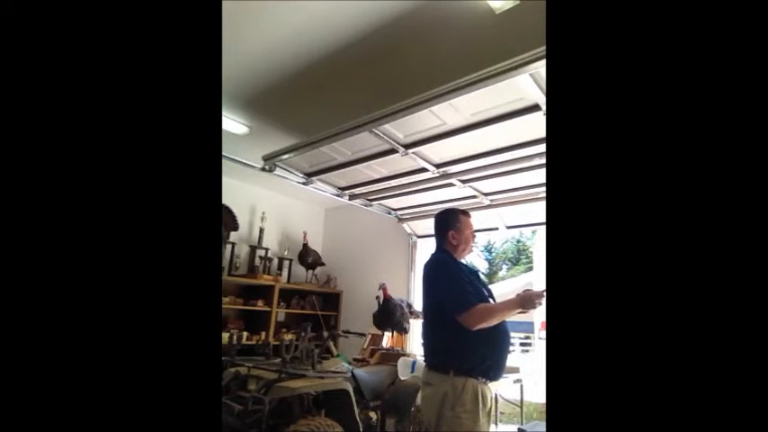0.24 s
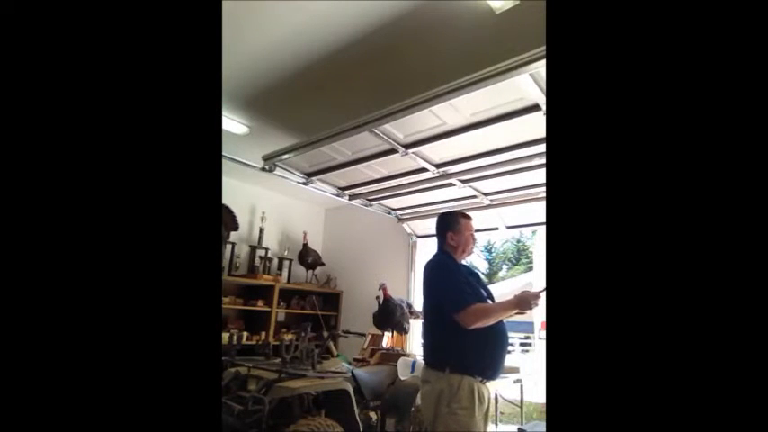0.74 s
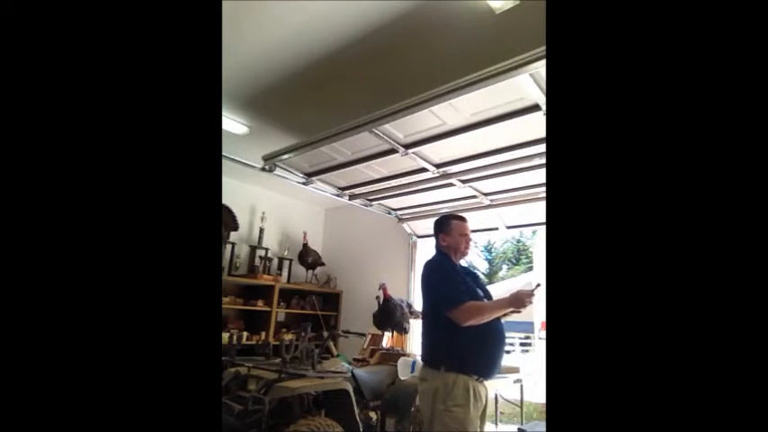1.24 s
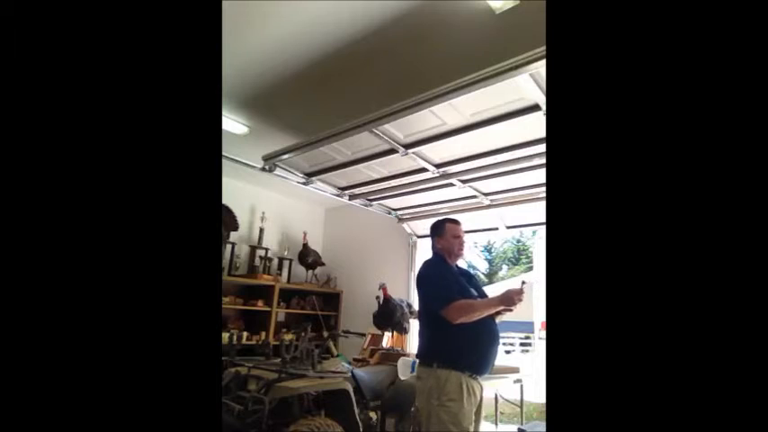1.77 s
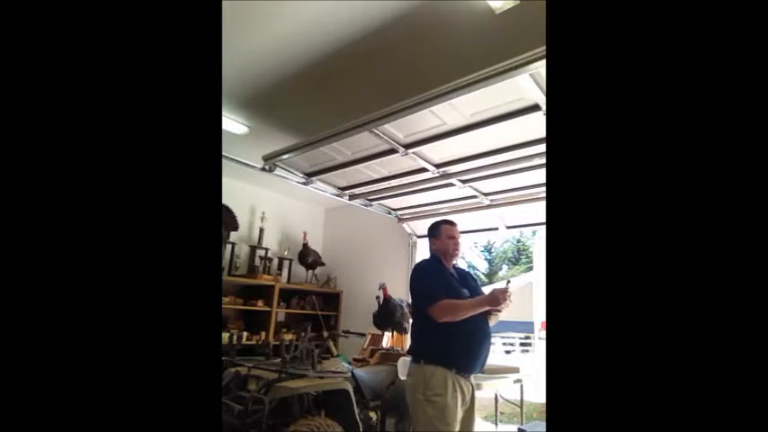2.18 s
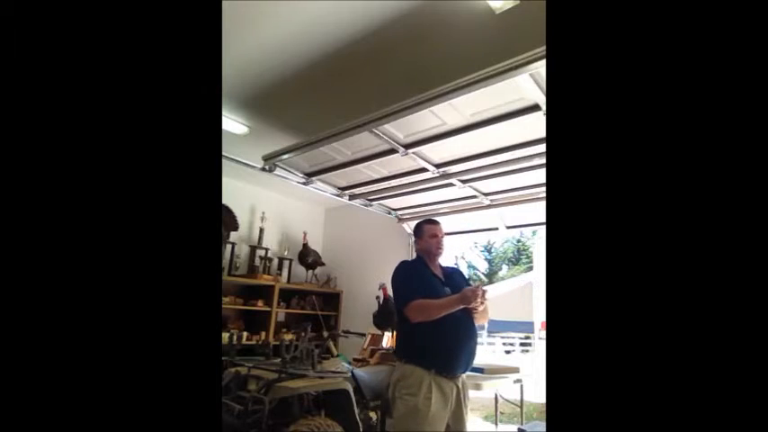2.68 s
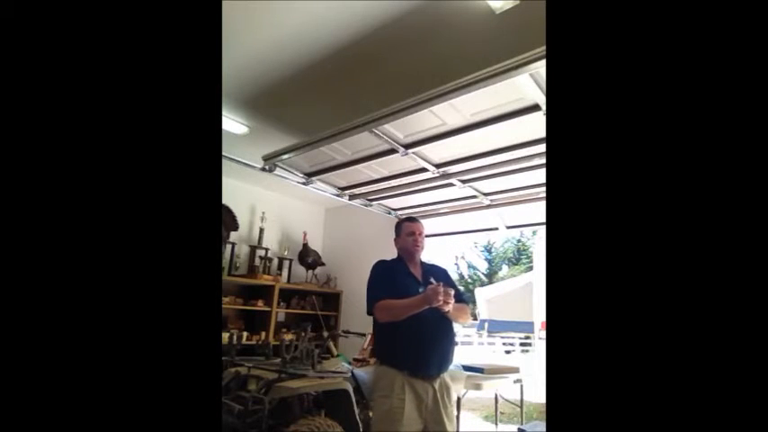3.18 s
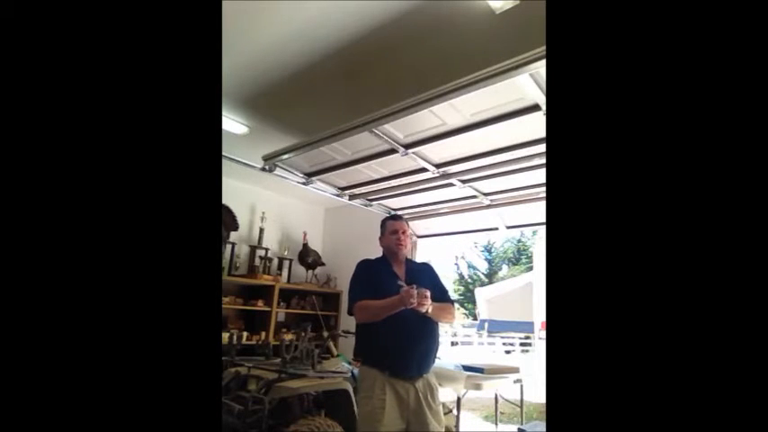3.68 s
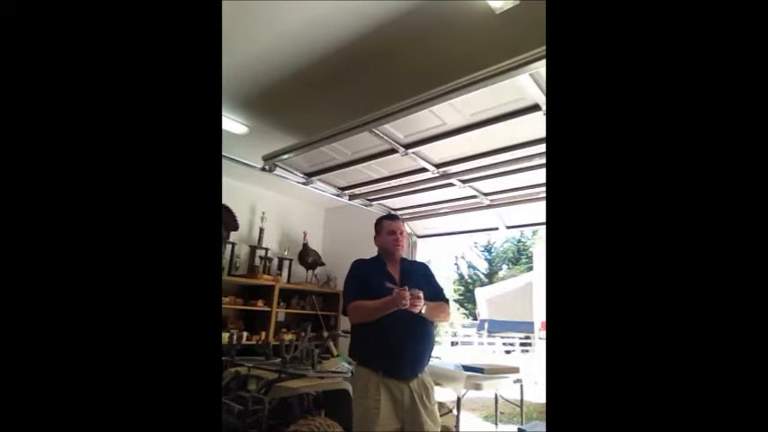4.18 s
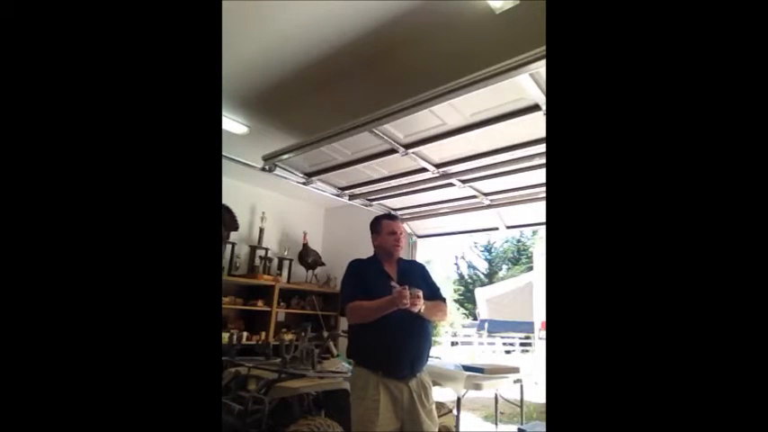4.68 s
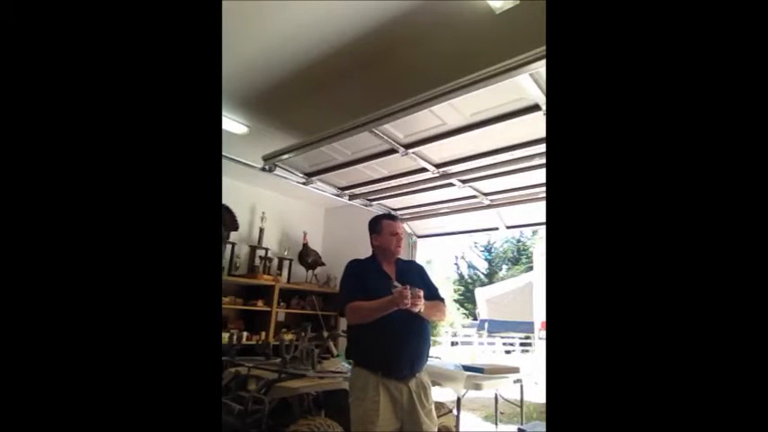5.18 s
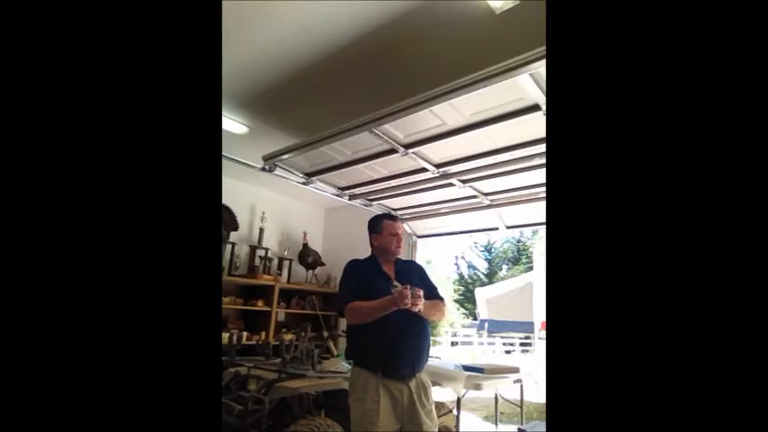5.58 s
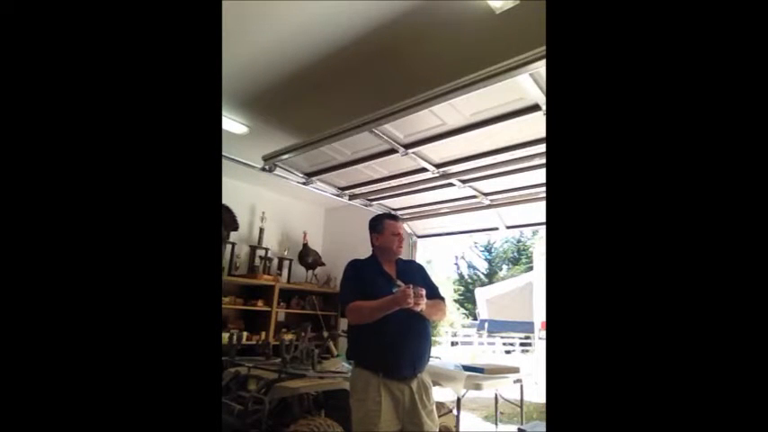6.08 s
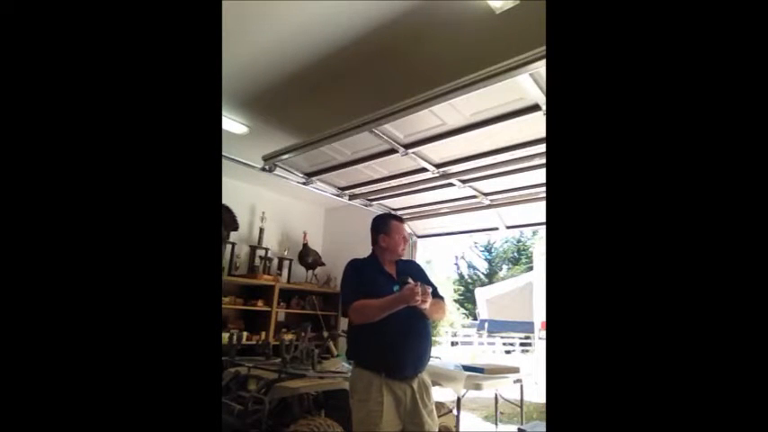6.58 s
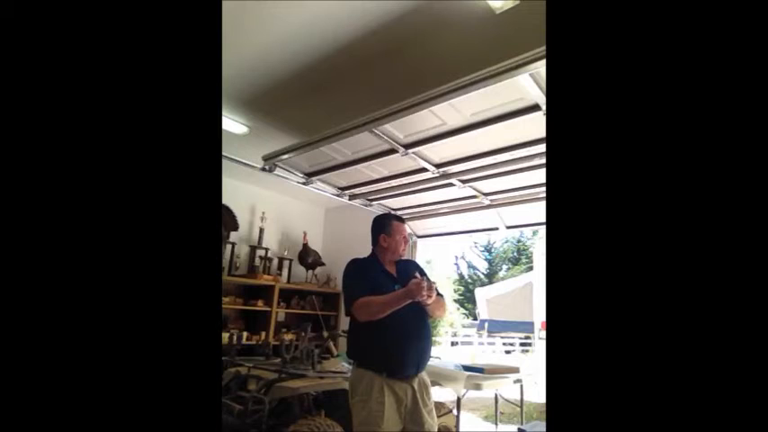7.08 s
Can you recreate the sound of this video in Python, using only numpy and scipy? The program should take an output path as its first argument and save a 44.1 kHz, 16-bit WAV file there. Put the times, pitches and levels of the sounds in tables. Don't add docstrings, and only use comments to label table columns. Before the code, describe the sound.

Several metres from a phone microphone in a concrete garage, a hand-stroked wooden turkey call gives a faint rub and soft try, then ten loud yelps, about three a second. Each is a brief high squeak breaking into a lower, woody rasp. After a gap come a faint lid touch and two dry, separate clucks, with bright echoes over distant outdoor hum.

```python
import sys
import numpy as np
from scipy import signal
from scipy.fft import rfft, irfft
from scipy.io import wavfile
from scipy.ndimage import uniform_filter1d, minimum_filter1d

SR = 44100
rng = np.random.default_rng(int(sys.argv[2]) if len(sys.argv) > 2 else 0)


def gain_from_db(level_db):
    decades = np.asarray(level_db, float) / 20
    return 10 ** decades


def generate_wav(sig):
    pcm = np.round(np.clip(np.atleast_2d(sig).T, -1, 1) * 32767).astype(np.int16)
    wavfile.write(sys.argv[1], SR, pcm)


N = 323694


def curve(table, x):
    return np.interp(x, *np.transpose(table))


def colour_db(table, hz):
    f, db = np.transpose(table)
    return np.interp(np.log(np.maximum(hz, 1)), np.log(f), db)


def noise(table, db):
    spectrum = rfft(rng.standard_normal(N))
    x = irfft(spectrum * gain_from_db(colour_db(table, np.fft.rfftfreq(N, 1 / SR))), N)
    return x / x.std() * gain_from_db(db)


def add_clicks(track, at, size):
    taps = np.floor(at)[:, None] + np.arange(-7, 9)
    gap = taps - at[:, None]
    window = np.cos(np.pi * gap / 16) ** 2
    np.add.at(track, taps.astype(int), size[:, None] * np.sinc(gap) * window)


def split_filter(x, order, hz, kind="low"):
    return signal.sosfilt(signal.butter(order, hz, kind, fs=SR, output="sos"), x)


# (frequency [Hz], density [dB per Hz])
HUM = [(18, -59.5), (30, -37), (53, -40.5), (114, -7.5), (230, -10), (808, -7.5), (1910, -15), (3400, -18),
       (10500, -28), (13000, -26.5), (15500, -26.5)]


def outdoor_hum():
    return noise(HUM, -66)


# (frequency [Hz], rms level [dB])
MAINS = [(166.9, -86.5), (242.2, -82.5)]


def mains_whine(t):
    return sum(gain_from_db(db) * np.sqrt(2) * np.sin(2 * np.pi * hz * t) for hz, db in MAINS)


# (time [s], level [dB])
TAIL_LEVEL = [
    (0, -61),
    (.1, -62.5),
    (.25, -84),
    (.4, -95),
]
# (frequency [Hz], density [dB per Hz])
TAIL_COLOUR = [(88, -38.5), (150, 1.5), (228, -33), (296, -1.5), (415, -11.5), (1210, -11), (1750, -10.5),
               (6000, -21), (7800, -52), (13200, -120)]


def opening_tail(t):
    return noise(TAIL_COLOUR, curve(TAIL_LEVEL, t))


# (frequency [Hz], time to fall 60 dB [s])
ROOM_T60 = [(250, 0.2), (600, 0.62), (1200, 0.68), (2400, 0.56), (4800, 0.59), (9600, 0.5), (15000, 0.65)]
# (time [s], level [dB])
ECHOES = [(.0032, -14), (.0072, -7), (.0155, -8), (.033, -10), (.0485, -9)]


def garage(size=50000):
    room_db, build_s = -2.5, 0.02
    patchy_db, patch_s = 3, 0.0025
    wall_hz = 7940
    t = np.arange(size) / SR
    octave = np.log2(np.maximum(np.fft.rfftfreq(size, 1 / SR), 1))
    dense = rfft(rng.standard_normal(size))
    centres = np.log2(np.array(ROOM_T60)[:, 0])
    tail = 0
    for row, (_, t60) in zip(np.eye(len(centres)), ROOM_T60):
        band = irfft(dense * np.interp(octave, centres, row), size)
        tail = tail + band * gain_from_db(-60 * t / t60)
    tail = tail * (1 - np.exp(-t / build_s))
    patch = int(patch_s * SR)
    clumps = uniform_filter1d(rng.standard_normal(size), patch) * np.sqrt(patch)
    tail = tail * gain_from_db(patchy_db * clumps)
    room = gain_from_db(room_db) * tail / np.sqrt(np.sum(tail ** 2))
    for s, db in ECHOES:
        add_clicks(room, np.array([s * SR]), gain_from_db(np.array([db])))
    room = split_filter(room, 1, wall_hz)
    room[0] += 1
    return room


# (frequency [Hz], gain [dB])
BOX = [(60, -82.5), (500, -42), (654, -40), (950, -28.5), (1250, -2), (2060, -9), (2260, -26.5),
       (2650, -23.5), (3150, -23.5), (4600, -26.5), (5100, -41), (8000, -42), (11800, -44.5), (15500, -62)]
# (frequency [Hz], width [Hz], gain [dB])
BOX_MODES = [(1315, 260, 2), (1695, 150, 11), (1936, 160, 14), (2440, 120, -9), (2746, 170, 4.5),
             (2934, 54, 9), (3132, 120, 10), (3850, 190, 3.5), (4420, 420, -2), (5684, 450, 7.5),
             (6740, 1000, 7), (7664, 400, 3.5), (8560, 280, -10.5), (11400, 1500, -6)]


def box_response(size=4096):
    hz = np.fft.rfftfreq(size, 1 / SR)
    db = colour_db(BOX, hz)
    for f, width, gain in BOX_MODES:
        db = db + gain / (1 + (2 * (hz - f) / width) ** 2)
    cep = irfft(db * np.log(10) / 20, size)
    cep[1:size // 2] *= 2
    cep[size // 2 + 1:] = 0
    ring = irfft(np.exp(rfft(cep)), size)[:size // 2]
    return ring / np.sqrt(np.sum(ring ** 2))


# (time [s], level [dB])
RUB = [
    (.55, -105),
    (.58, -72.5),
    (.66, -70.5),
    (.7, -73),
    (.72, -108),
]


def lid_rub(t):
    return gain_from_db(curve(RUB, t)) * rng.standard_normal(N)


# (time [s], level [dB], contact [s])
TOUCH = [
    (6.094, -28.5, 0.00058),
    (6.112, -11, 0.00045),
    (6.117, 2, 0.0012),
]


def lid_touch():
    force = np.zeros(N)
    for s, db, contact in TOUCH:
        push = np.hanning(int(contact * SR) + 2)
        start = int(s * SR)
        force[start:start + len(push)] += gain_from_db(db) * push / push.sum()
    return force


# (slip rate [Hz], pairing [0..1, negative doubles the rate])
PAIRING = [(620, 0.72), (670, 0.19), (720, 0.38), (870, -0.42), (970, -0.5), (1050, -2.4)]
# (slip rate [Hz], rasp [0..1])
RASP = [(620, .45), (670, .28), (720, 0.12), (800, .15), (1050, .18)]
# (time [s], pressure change [dB], width [s])
CATCHES = [(0.808, 5.5, 0.029), (1.188, 7.5, .008), (1.575, 4.5, 0.0072), (1.583, -12.5, .003),
           (1.969, -12.5, 0.0031), (1.998, 2, 0.031), (2.632, 6, 0.0082), (2.666, -6.5, 0.005),
           (3.699, 0, 0.012), (4.051, -0.5, 0.014), (2.338, -7, .006), (2.355, 5, .005), (2.642, 7, .012),
           (2.968, 1.5, 0.019), (2.987, -5.5, 0.0044), (3.32, -27, .005), (3.341, 5.5, 0.0099),
           (3.637, -3, .006), (3.662, 8.5, 0.0095), (4.086, 6.5, 0.013), (4.491, -9, .012),
           (4.516, 1.5, 0.014), (6.385, 1.5, 0.0049), (6.412, 7, 0.0032), (6.428, 7.5, 0.0071)]


def stroke(squeak, heavy, grip, waver):
    start, high_hz, light_db, slide, break_hz = squeak
    snap, length, low_hz, full_db, fade_db = heavy
    soft_db, hard_db, rough, paired, drop = grip
    drift = 0.03
    quickest_s, attack_db, release_s, release_db = 0.0045, -21, 0.015, -25
    flutter_db, flutter_s = 1.5, 0.014

    i = np.arange(int(start * SR), int((snap + length + release_s) * SR))
    t = i / SR - snap
    hz = np.interp(t, [-slide, 0, drop, drop + length],
                   [high_hz, break_hz, low_hz * (1 + drift), low_hz * (1 - drift)])

    end_db = full_db + fade_db
    db = np.interp(t, [-slide, 0, length, length + release_s],
                   [light_db, full_db, end_db, end_db + release_db])
    attack_s = max(quickest_s, snap - slide - start)
    db = db + attack_db * np.clip(1 - (i / SR - start) / attack_s, 0, 1)
    for s, change, width in CATCHES:
        db = db + change * np.exp(-((i / SR - s) / width) ** 2)
    span = int(flutter_s * SR)
    pulse = np.tanh(uniform_filter1d(waver, span)[:len(i)] * np.sqrt(span))
    db = db + flutter_db * (t > 0) * pulse

    pairing = curve(PAIRING, hz) + paired * (t > drop)
    rasp = np.clip(rough * curve(RASP, hz), 0, 1)
    bite_db = np.interp(t, [-drop, drop, drop + length], [soft_db, hard_db + 6, hard_db - 2.5])
    bite_db = bite_db - 0.5 * (db + 12)
    return i, hz, db, pairing, rasp, bite_db


def rattle(sharp):
    for lag in (7, 17, 31):
        allpass = np.r_[1, np.zeros(lag - 1), -0.6]
        sharp = signal.lfilter(allpass[::-1], allpass, sharp)
    return sharp


# (start [s], slip rate [Hz], pressure [dB], slide [s], rate at the break [Hz])
SQUEAKS = [(0.69, 942, -31.5, .009, 858), (1.094, 970, -25, 0.025, 873.6), (1.526, 1005, -27, 0.034, 903),
           (1.884, 1044, -24, 0.046, 874), (2.238, 1049, -24, .035, 902),
           (2.587, 1056, -25.5, 0.026, 839.5), (2.904, 1072, -25.5, 0.029, 861),
           (3.254, 1055, -30, 0.025, 828), (3.585, 1002, -17.5, .03, 923), (3.98, 1024, -28, 0.044, 887.4),
           (4.393, 1040, -34.5, 0.041, 861.6), (6.373, 900, -23.5, .004, 778),
           (7.061, 886, -11.5, 0.0019, 798)]
# (break [s], length [s], slip rate [Hz], pressure [dB], fade by its end [dB])
RASPS = [(0.756, .062, 782, -16.5, -9), (1.203, 0.062, 709, -12, -9), (1.586, 0.094, 669.3, -8.5, -8),
         (1.938, 0.068, 670.3, -10, -2), (2.291, 0.064, 636.5, -9.5, -2.5), (2.618, 0.076, 631, -14.5, 1),
         (2.944, 0.096, 635.8, -10.5, -6), (3.289, 0.053, 633, -13.5, -1), (3.623, .086, 642.6, -13.5, -1),
         (4.024, 0.1, 646.2, -13, -0.5), (4.444, 0.067, 642.4, -5, -5.5), (6.377, 0.028, 700.9, -12, 6.5),
         (7.066, 0.018, 693.6, -9.5, -0.5)]
# (squeak bite [dB], rasp bite [dB], rasp factor [ratio], extra pairing [ratio], drop [s])
GRIPS = [(-16, -12, 0.32, 0.062, 0.0069), (-9.5, -2.5, 0.89, -0.015, 0.0065), (-5, -0.5, .7, -0.13, 0.0064),
         (-4, 0., 0.99, 0.32, 0.008), (-1, 0.5, .9, -0.16, 0.0058), (-7.5, 1.5, .9, -0.13, 0.0071),
         (-1.5, 0.5, 1.1, -.05, .01), (3, 2.5, 1.5, -0.34, 0.0051), (-4, 0.5, 1.2, -0.12, 0.011),
         (-5, 1, 0.85, .1, 0.016), (1.5, 0, 0.85, 0.17, 0.0074), (-10.5, 3, 1.74, 0.014, .008),
         (-1.5, 4, 2.5, 0.16, 0.0047)]


def lid_strokes():
    jitter, scatter_db, scrape_db = 0.07, 9, -16
    wobble, wobble_s = 0.1, 0.008
    even_treble = 0.31
    bite_hz = 2130
    dull, sharp = np.zeros(N), np.zeros(N)
    for squeak, heavy, grip in zip(SQUEAKS, RASPS, GRIPS):
        chance = rng.standard_normal((512, 2))
        grit = rng.standard_normal(SR // 4)
        i, hz, db, pairing, rasp, bite_db = stroke(squeak, heavy, grip, grit[::-1])
        span = int(wobble_s * SR)
        waver = uniform_filter1d(grit, span)[:len(i)] * np.sqrt(span)
        hz = hz * (1 + wobble * rasp * waver)
        phase = 2 * np.cumsum(hz) / SR
        k = np.arange(1, int(phase[-1]))
        at = np.interp(k, phase, i)
        j = at.astype(int) - i[0]
        at = at + jitter * rasp[j] * chance[k, 0] * SR / hz[j]
        scatter = scatter_db * rasp[j] * chance[k, 1]
        size = np.sqrt(SR / hz[j]) * gain_from_db(db[j] + scatter)
        full_slip = 1 + np.clip(pairing[j], 0, 1) * (-1.) ** (k // 2)
        half_slip = np.clip(-pairing[j], 0, 1)
        size = size * np.where(k % 2, half_slip, full_slip)
        add_clicks(dull, at, size)
        add_clicks(sharp, at, size * gain_from_db(bite_db[j] - even_treble * scatter))
        sharp[i] += gain_from_db(db + bite_db + scrape_db) * rasp * grit[:len(i)]
    low = split_filter(dull + lid_touch(), 2, bite_hz)
    return low - split_filter(rattle(sharp), 2, bite_hz, "high")


def scene():
    t = np.arange(N) / SR
    background = outdoor_hum() + mains_whine(t) + opening_tail(t)
    force = lid_strokes() + lid_rub(t)
    call = signal.fftconvolve(force, box_response())[:N]
    heard = signal.fftconvolve(call, garage())[:N]
    return (heard + background)[None]


def top_cut(x):
    return signal.sosfilt(signal.butter(12, 15670, fs=SR, output="sos"), x)


def record(dry):
    lopsided, bend_hz = 0.016, 204
    ceiling, hold_s = 0.97, 0.004
    bend = split_filter(dry * dry * np.abs(dry), 2, bend_hz, "high")
    x = dry + lopsided * bend
    hold = int(hold_s * SR) | 1
    duck = minimum_filter1d(ceiling / np.maximum(np.abs(x), ceiling), hold)
    duck = uniform_filter1d(uniform_filter1d(duck, hold // 2), hold // 2)
    return top_cut(x * duck)


dry = scene()
out = record(dry)
generate_wav(out)
```